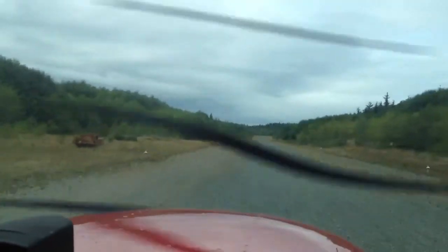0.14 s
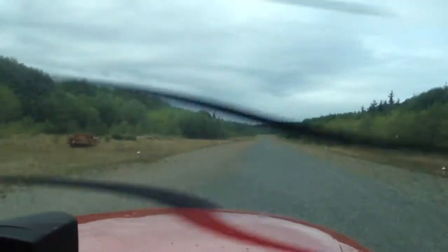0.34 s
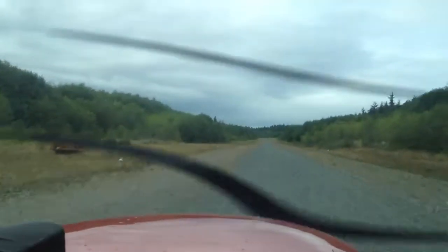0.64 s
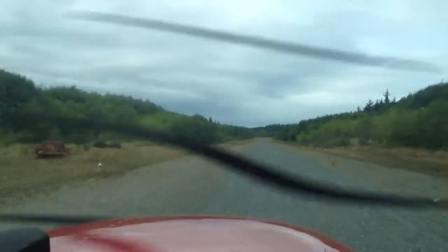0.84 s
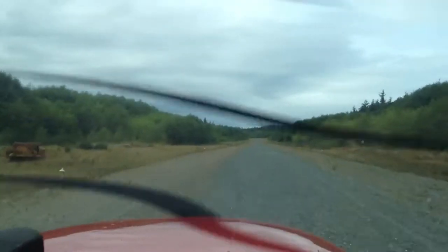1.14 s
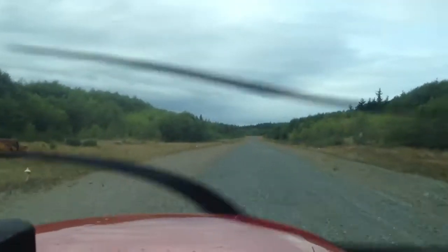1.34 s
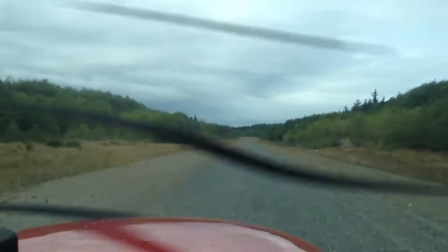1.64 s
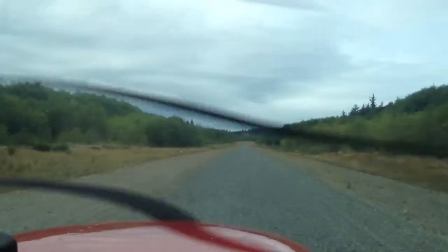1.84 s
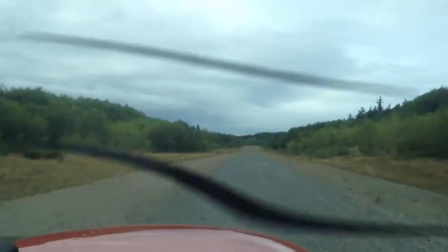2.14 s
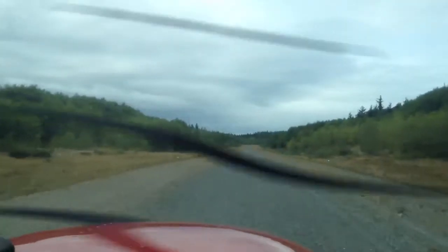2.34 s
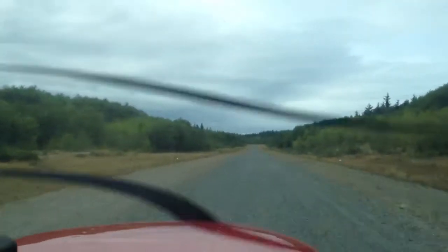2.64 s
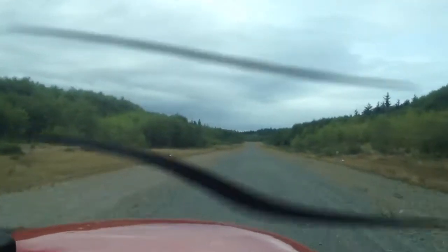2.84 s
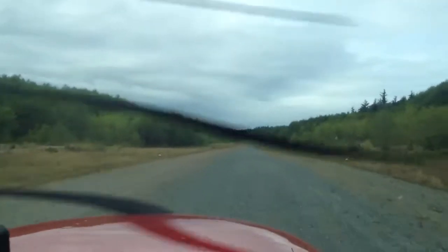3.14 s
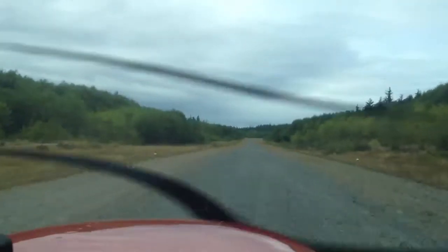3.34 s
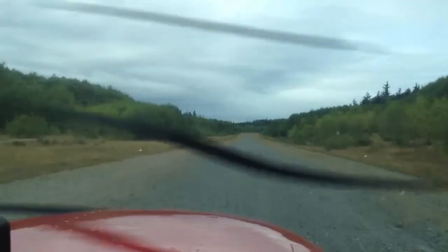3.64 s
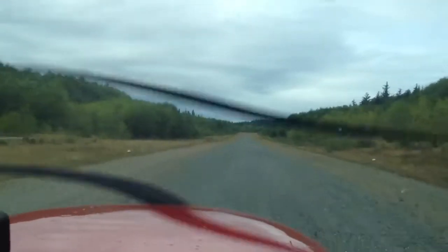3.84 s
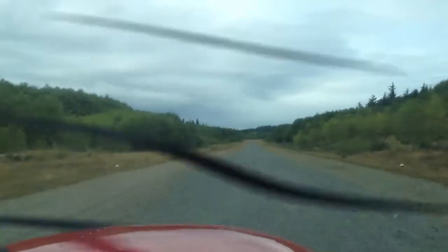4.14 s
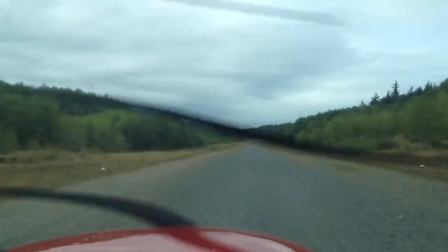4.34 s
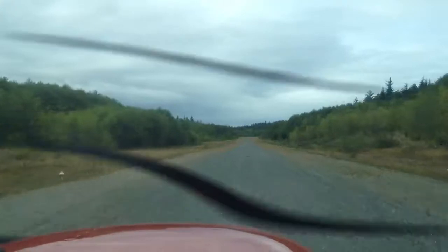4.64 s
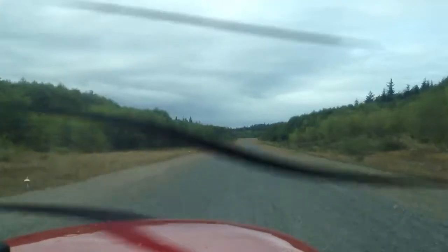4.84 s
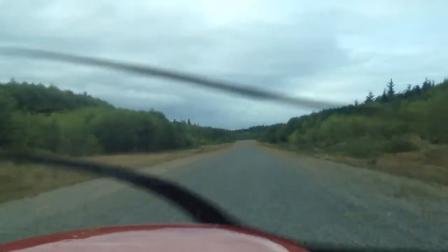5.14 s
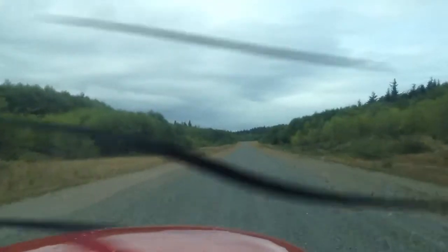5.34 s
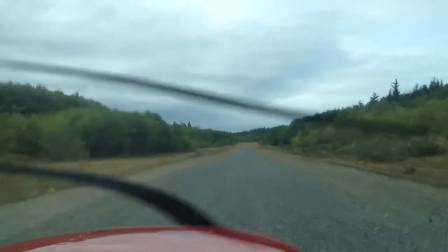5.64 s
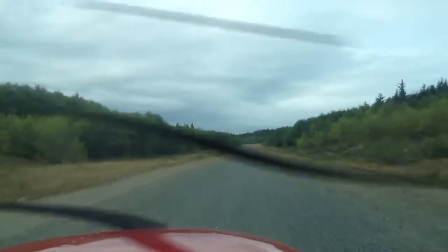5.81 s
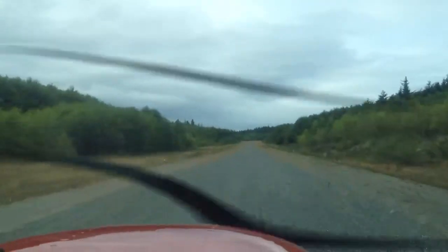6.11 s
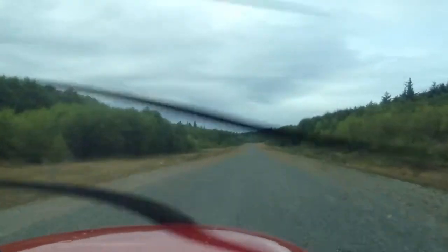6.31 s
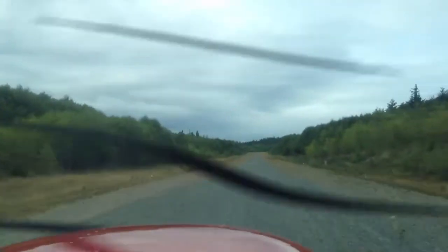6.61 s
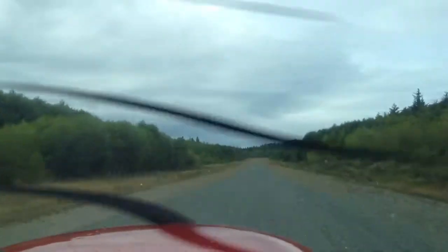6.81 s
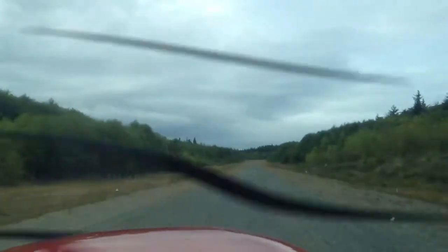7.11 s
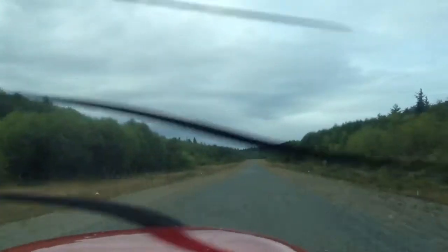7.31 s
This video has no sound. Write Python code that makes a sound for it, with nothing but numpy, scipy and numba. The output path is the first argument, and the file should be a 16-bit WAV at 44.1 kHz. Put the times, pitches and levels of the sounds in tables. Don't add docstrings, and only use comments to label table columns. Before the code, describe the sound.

Inside a small propeller plane on its take-off roll, a rapid hollow panel knocking fades out while a deep engine drone and roaring air swell.

```python
import sys
import numpy as np
from scipy import signal
from scipy.fft import rfft, irfft
from scipy.io import wavfile
from scipy.ndimage import uniform_filter1d, minimum_filter1d
from numba import njit

SR = 44100
rng = np.random.default_rng(int(sys.argv[2]) if len(sys.argv) > 2 else 0)


def level_to_linear(level):
    exponent = np.asarray(level, float) / 20
    return 10 ** exponent


def waveform_to_disk(signal):
    frames = np.transpose(np.atleast_2d(signal))
    scaled = np.clip(frames, -1, 1) * 32767
    samples = np.round(scaled).astype(np.int16)
    wavfile.write(sys.argv[1], SR, samples)


N = 329427

# start_s [s], duck_db [dB]
DUCKS = [(.48, 1.5), (1.9, 2.5), (2.04, 4), (2.42, 0.5), (2.65, 2), (2.93, 4.5), (3.56, 4), (3.71, 1.5),
         (4.05, 4), (4.21, 2.5), (4.7, 1.5), (5.22, 1.5), (5.6, 1.5), (5.98, 1), (6.5, 2), (6.94, 2.5)]


def unit(x):
    return x / np.sqrt(np.mean(x ** 2))


def curves(table):
    s, *columns = np.transpose(table)
    return [np.interp(np.arange(N) / SR, s, column) for column in columns]


def walk(rate_hz):
    hold = int(SR / rate_hz)
    steps = np.repeat(rng.standard_normal(N // hold + 1), hold)
    return 1.07 * uniform_filter1d(uniform_filter1d(steps, hold), hold)[:N]


def band(x, lo_hz, hi_hz):
    return signal.sosfilt(signal.butter(2, [lo_hz, min(hi_hz, SR / 2.1)], "band", fs=SR, output="sos"), x)


def turbulence(table, flicker_db, flicker_rate, count, peaks=()):
    hz, db = np.transpose(table)
    bins = np.maximum(np.arange(N // 2 + 1) * SR / N, 1)
    shape_db = np.interp(np.log(bins), np.log(hz), db, -120, -120)
    for peak_hz, width_hz, peak_db in peaks:
        shape_db = shape_db + peak_db / (1 + (2 * (bins - peak_hz) / width_hz) ** 2)
    shape = level_to_linear(shape_db)
    place = np.log(bins / hz[0]) / np.log(hz[-1] / hz[0]) * (count - 1)
    out, shared = 0, walk(flicker_rate)
    for k in range(count):
        share = np.sqrt(np.clip(1 - abs(place - k), 0, 1))
        last, shared = shared, walk(flicker_rate)
        noise = irfft(rfft(rng.standard_normal(N)) * shape * share, N)
        out = out + level_to_linear(flicker_db * (last + shared) / 2) * noise
    return unit(out)


def phone_gain():
    # start_s [s], gain_db [dB]
    slow_gain = [(0, -9.5), (.3, -6), (1.3, -7.5), (1.85, -1), (2.1, 1), (2.3, 3), (2.9, 3), (3.2, 1.5),
                 (3.5, 2), (3.9, 0.5), (4.55, 3.5), (4.9, 1.5), (5.2, -1), (5.7, 1.5), (6.3, 2), (6.8, 0.5),
                 (7.47, 1.5)]
    fall_s, recover_s = 0.011, 0.18
    duck_s, depth_db = np.transpose(DUCKS)
    after = np.maximum(np.arange(N) / SR - duck_s[:, None], 0)
    duck_db = depth_db @ ((1 - np.exp(-after / fall_s)) * np.exp(-after / recover_s))
    return curves(slow_gain)[0], duck_db


def shaft_turns():
    speed = [
        (0, 40.88),
        (.25, 40.46),
        (.55, 40.57),
        (1, 40.67),
        (1.5, 40.66),
        (2.05, 40.66),
        (3, 40.73),
        (4.5, 40.8),
        (6, 40.86),
        (7.47, 40.9),
    ]
    return np.cumsum(curves(speed)[0]) / SR


def slipstream_hiss(turns, gain_db):
    # pitch_hz [Hz], level_db [dB per Hz]
    spectrum = [(2650, -34), (4500, -7), (6110, -3), (8550, -2), (9880, -4.5), (14300, -7), (15500, -13)]
    puff = 1 + 0.062 * np.cos(2 * np.pi * 2 * turns) + 0.044 * np.cos(2 * np.pi * turns)
    air = turbulence(spectrum, flicker_db=-0.5, flicker_rate=12, count=4)
    return level_to_linear(-37 + gain_db + 0.34 * walk(9)) * puff * air


def slipstream_roar(slow_db, duck_db):
    # pitch_hz [Hz], level_db [dB per Hz]
    spectrum = [(35, -35), (60, -22.5), (177, 1.5), (284, -8.5), (430, -6.5), (617, -9.5), (726, -12.5),
                (902, -16), (1080, -17.5), (1730, -23.5), (2390, -30.5), (3190, -34), (4500, -50),
                (5850, -77), (9900, -120)]
    # pitch_hz [Hz], width_hz [Hz], level_db [dB]
    fittings = [(184, 10.5, 2.5), (908, 113, 4), (1322, 39, 6), (1537, 17, 1.5), (1766, 45, 7),
                (2153, 77, 4), (2764, 28, 8), (3180, 78, 3), (3610, 880, 5)]
    air = turbulence(spectrum, flicker_db=0.5, flicker_rate=12, count=14, peaks=fittings)
    return level_to_linear(-14.5 + 0.97 * slow_db - 1.3 * duck_db + 0.43 * walk(30)) * air


def stones():
    hits = [
        (5.5019, -19, 0.02),
        (6.1878, -16, 0.02),
        (6.3144, -20, 0.02),
        (6.3704, -14, 0.02),
        (6.3774, -28, 0.02),
        (6.556, -15, 0.02),
        (7.044, -11, 0.02),
    ]
    out, t = np.zeros(N), np.arange(SR // 20) / SR
    for s, db, scatter_s in hits:
        i = int(s * SR)
        fade = 0.62 * np.exp(-t / 0.00072) + 0.7 * level_to_linear(-60 * t / (3 * scatter_s))
        out[i:i + len(t)] += level_to_linear(db) * fade * rng.standard_normal(len(t))
    return level_to_linear(-6.0) * band(out, 6300, 14000)


def drone(turns, gain_db):
    strong = (2, 3, 4, 6)
    # level_db [dB], weakest_s [s], period_s [s], depth [0-1]
    beats = [(-32, 1.2, 16, 0.28), (-27, 6.67, 5.7, 0.65), (-23, 3.64, 2.2, 0.33), (-26, 3.58, 2.69, 0.53)]
    # multiple of shaft speed, mid-roll level_db [dB], drift_db_s [dB/s] as speed builds
    weaker = [(4.5, -36, -3.3), (5, -35, -2.8), (5.5, -41, -1.3), (6.5, -43, 0), (7, -35, 0),
              (7.5, -33, -.3), (8, -30, 1.5), (8.5, -41, 2), (9, -38, -.8), (10, -32, -1.3),
              (10.5, -34, 1.5), (11, -31, .5), (11.5, -40, -.5), (12, -36, -2), (12.5, -38, 0),
              (13, -35, 1.6), (13.5, -42, 1.8), (14, -33, 0), (15, -36, 3.3), (15.5, -41, 1), (16, -42, 0)]
    mid_roll_s, drift_from_s, growth_db_s = 4.4, 2.5, 0.93
    out, t = 0, np.arange(N) / SR
    for multiple, (db, weak_s, period_s, depth) in zip(strong, beats):
        beat = abs(1 - depth * np.exp(2j * np.pi * (t - weak_s) / period_s))
        level = level_to_linear(growth_db_s * (t - mid_roll_s) + db + 1.1 * walk(6))
        out = out + beat * level * np.sin(2 * np.pi * multiple * turns + .25 * walk(6))
    for multiple, db, drift in weaker:
        line_db = db + drift * (np.maximum(t, drift_from_s) - mid_roll_s)
        phase = rng.uniform(0, 2 * np.pi) + .35 * walk(4)
        out = out + level_to_linear(line_db + 1.5 + 3 * walk(2)) * np.sin(2 * np.pi * multiple * turns + phase)
    return np.sqrt(2) * level_to_linear(1.25 * gain_db) * out


def panel_blows(turns):
    strength = [(0, -19), (.53, -18.5), (.62, -22.5), (.85, -20.5), (1.2, -18.5), (1.31, -24.5),
                (1.41, -19.5), (1.5, -29.5), (1.6, -21.5), (1.9, -25.5), (3.1, -39)]
    # start_s [s], peak_db [dB]
    cracks = [(0.0298, -17), (0.0543, -28), (0.0802, -23), (0.1052, -17), (0.1286, -26), (0.1535, -18),
              (0.177, -21), (0.2014, -23), (0.2264, -28), (0.2513, -26), (0.2773, -32), (0.3257, -22),
              (0.4249, -18), (0.4494, -17), (0.4988, -23), (0.5227, -22), (0.6459, -22), (0.7447, -16),
              (0.7687, -17), (0.818, -19), (0.843, -18), (0.9168, -25), (0.9657, -19), (1.0146, -24),
              (1.041, -27), (1.0894, -28), (1.1129, -20), (1.1378, -21), (1.1623, -19), (1.2605, -22)]
    last_turn = turns[int(strength[-1][0] * SR)]
    at = np.searchsorted(turns, np.arange(.275, last_turn))
    at = at + (.0004 * SR * rng.standard_normal(len(at))).astype(int)
    hard_db = -34 + 2 * rng.standard_normal(len(at))
    hard_db[0] = cracks[0][1]
    for s, db in cracks:
        hard_db[np.argmin(abs(at - s * SR))] = db
    size_db = curves(strength)[0][at] + 0.3 * (hard_db + 24) + 2.9 * rng.standard_normal(len(at))
    return at, size_db, hard_db


def contact(t):
    reseat_s = .0058
    return (1 - np.exp(-t / .0003)) * (.3 + .7 / (1 + np.exp((t - reseat_s) / .0006)))


def panel_boom(at, gain_db):
    modes = [(472, -5.5, 0.08), (486, -7, 0.08)]
    t, out = np.arange(SR // 20) / SR, np.zeros(N)
    boom_db = -17 + 0.5 * gain_db[at] - 9 * np.maximum(at / SR - 2.5, 0)
    sag = 1 - .13 / (1 + np.exp((2.3 - at / SR) / .1))
    for hz, db, t60 in modes:
        blow = level_to_linear(db + 2 * rng.standard_normal(len(at)) + boom_db)
        ring = np.sin(2 * np.pi * hz * np.outer(sag, t) + 2.3)
        fade = contact(t) ** .45 * level_to_linear(-60 * t / t60)
        np.add.at(out, at[:, None] + np.arange(len(t)), blow[:, None] * fade * ring)
    return out


def panel_ring(at, size_db, hard_db):
    modes = [(867.5, -1, 0.076), (916, -4.5, 0.072), (944, -7.5, 0.12), (1200, -1.5, 0.026),
             (1316, -6, 0.059), (1545, -8.5, 0.13), (1783, -13, 0.1), (1900, -13.5, 0.093),
             (2140, -24, 0.035)]
    t, out = np.arange(SR // 20) / SR, np.zeros(N)
    for hz, db, t60 in modes:
        bright_db = 0.5 * (hard_db + 18.5) * np.log2(hz / 900)
        blow = level_to_linear(db + 2 * rng.standard_normal(len(at)) + size_db + bright_db)
        ring = contact(t) * level_to_linear(-60 * t / t60) * np.sin(2 * np.pi * hz * t)
        np.add.at(out, at[:, None] + np.arange(len(t)), blow[:, None] * ring)
    return out


def panel_slap(at, size_db):
    t, slap = np.arange(SR // 20) / SR, np.zeros(N)
    slap[at] = level_to_linear(0.46 * (size_db + 17.5) - 26.0)
    return signal.oaconvolve(slap, np.sin(2 * np.pi * 950 * t) * (t < 1 / 950))[:N]


def panel_crack(at, hard_db):
    crack = np.zeros(N)
    crack[at + int(.0007 * SR)] = -level_to_linear(hard_db)
    return level_to_linear(22.0) * band(band(crack, 2400, 3880) + 0.48 * crack, 2900, 5700)


def panel_grit(at, size_db, hard_db):
    t, buzz = np.arange(SR // 20) / SR, np.zeros(N)
    buzz[at] = level_to_linear(size_db + 0.4 * (hard_db + 25) - 5.5)
    fade = signal.oaconvolve(buzz, np.exp(-t / 0.0069))[:N]
    return band(fade * rng.standard_normal(N), 1100, 3300)


def panel(turns, gain_db):
    at, size_db, hard_db = panel_blows(turns)
    body = panel_boom(at, gain_db) + panel_ring(at, size_db, hard_db) + panel_slap(at, size_db)
    body = level_to_linear(8.0) * uniform_filter1d(body, size=7)
    return body + panel_crack(at, hard_db) + panel_grit(at, size_db, hard_db)


def scene():
    turns = shaft_turns()
    slow_db, duck_db = phone_gain()
    gain_db = slow_db - duck_db
    air = slipstream_hiss(turns, gain_db) + slipstream_roar(slow_db, duck_db)
    return (air + stones() + drone(turns, gain_db) + panel(turns, gain_db))[None]


@njit
def recover(need, release):
    gain, g = np.empty(len(need)), 1.
    for i in range(len(need)):
        g = min(need[i], g + (1 - g) * release)
        gain[i] = g
    return gain


def limiter(x):
    ceiling, release_s = .71, .06
    need = minimum_filter1d(ceiling / np.maximum(abs(x), ceiling), size=90)
    return x * uniform_filter1d(recover(need, 1 / (release_s * SR)), size=45)


def low_rumble():
    t = np.arange(N) / SR
    thump_db = 2.5 * sum(db * np.exp(-((t - s) / .04) ** 2) for s, db in DUCKS)
    rumble = unit(band(rng.standard_normal(N), 18, 50))
    return level_to_linear(-38.5 - 17.5 + thump_db + 2.9 * walk(10)) * rumble


def roll_off(x):
    return signal.sosfilt(signal.butter(12, 15820, fs=SR, output="sos"), x)


def record(dry):
    bass_cut = signal.butter(4, 72, "high", fs=SR, output="sos")
    top_cut = signal.ellip(12, .3, 70, 15380, fs=SR, output="sos")
    limited = limiter(signal.sosfilt(bass_cut, dry[0]))
    mix = signal.sosfilt(top_cut, limited + low_rumble())
    return roll_off(mix[None])


dry = scene()
out = record(dry)
waveform_to_disk(out)
```